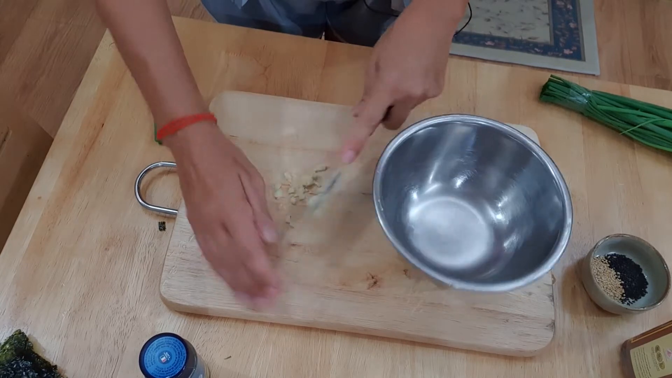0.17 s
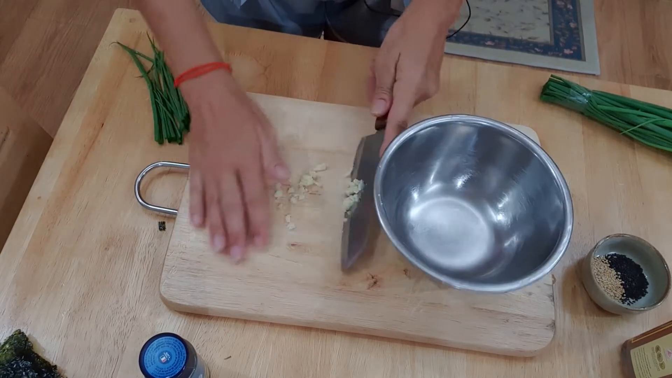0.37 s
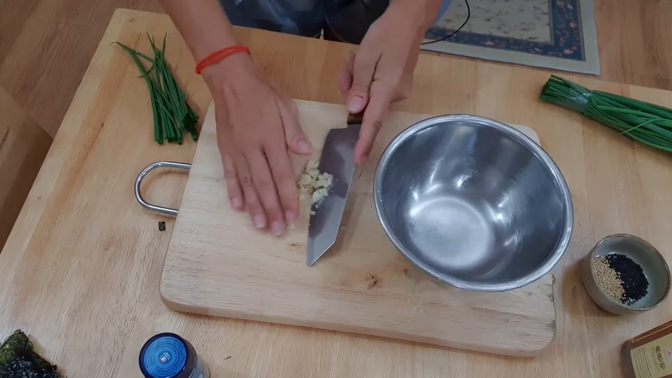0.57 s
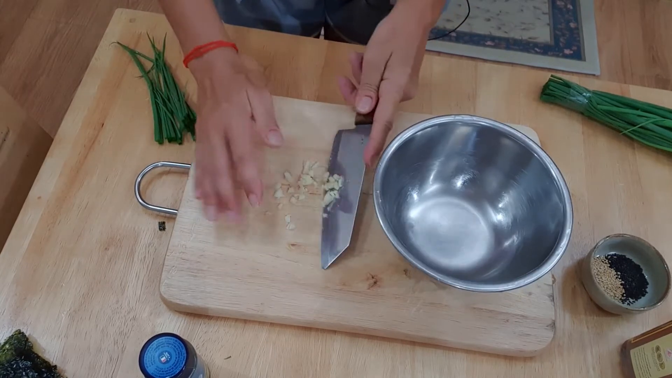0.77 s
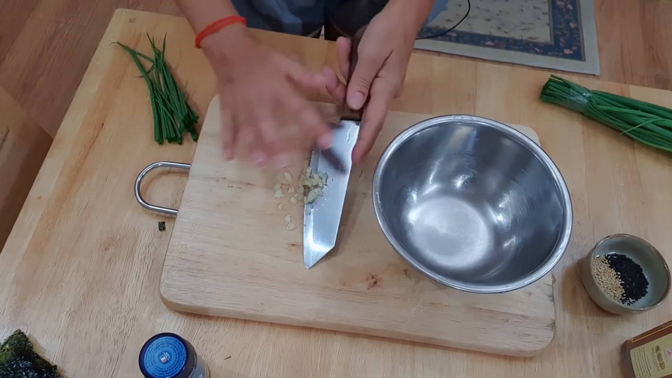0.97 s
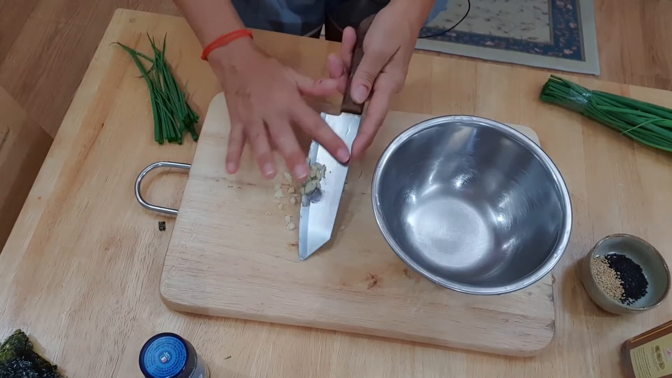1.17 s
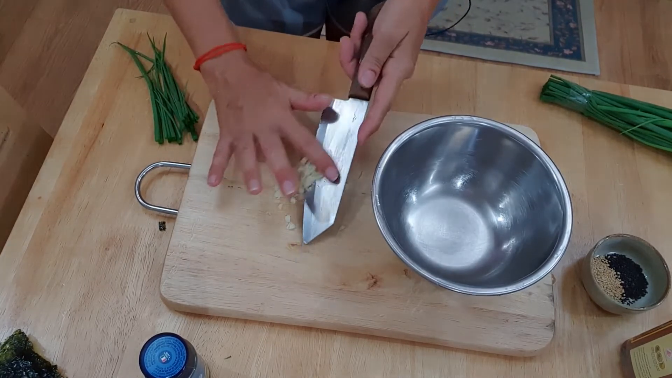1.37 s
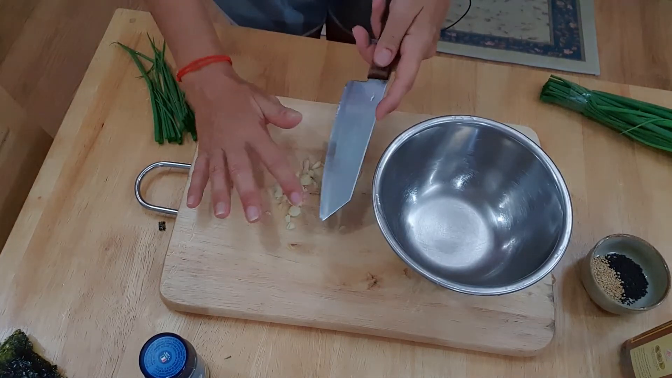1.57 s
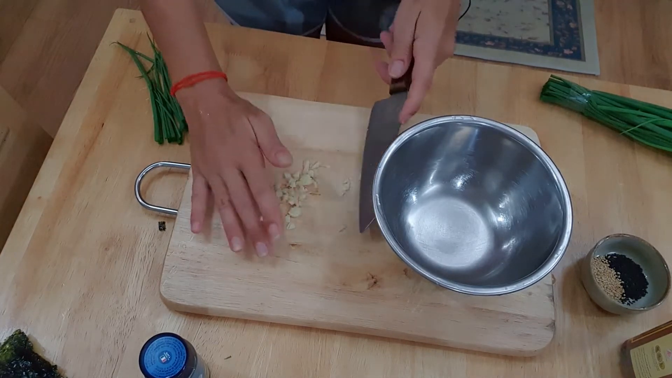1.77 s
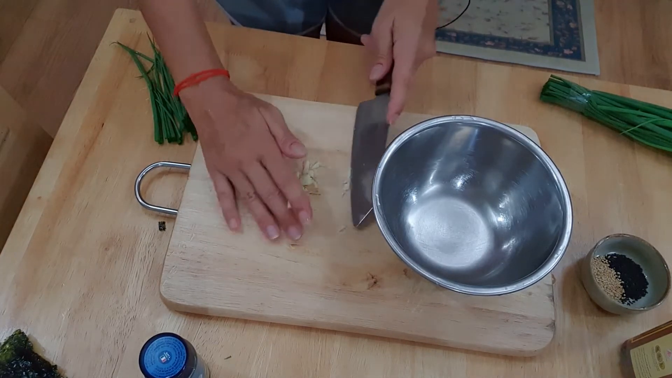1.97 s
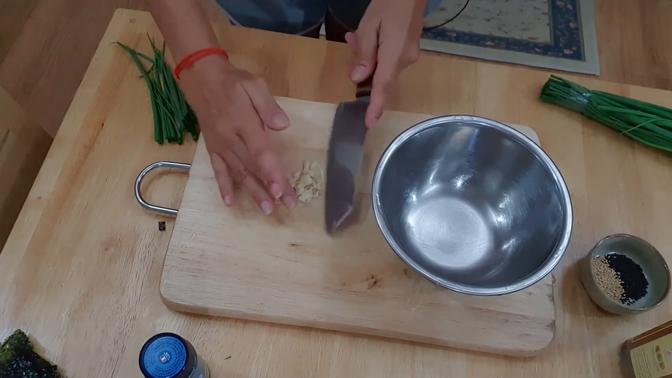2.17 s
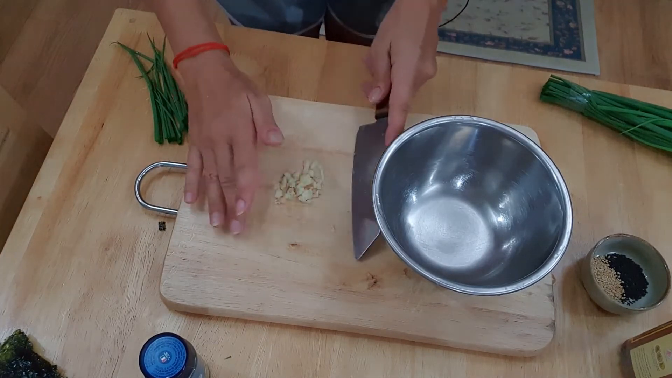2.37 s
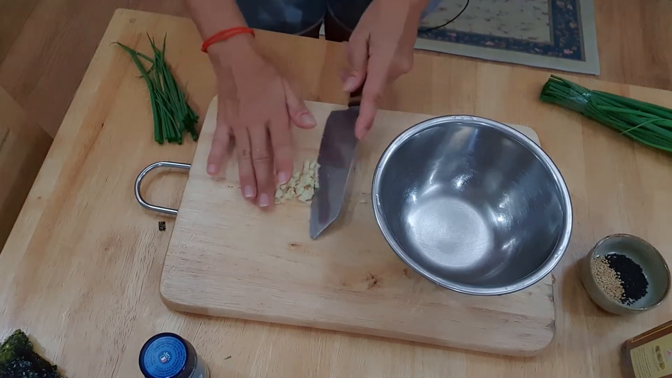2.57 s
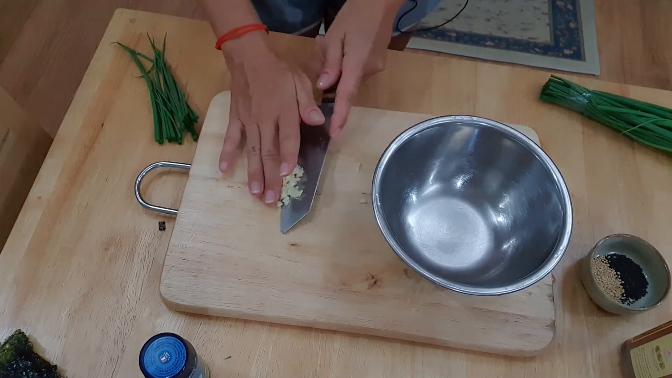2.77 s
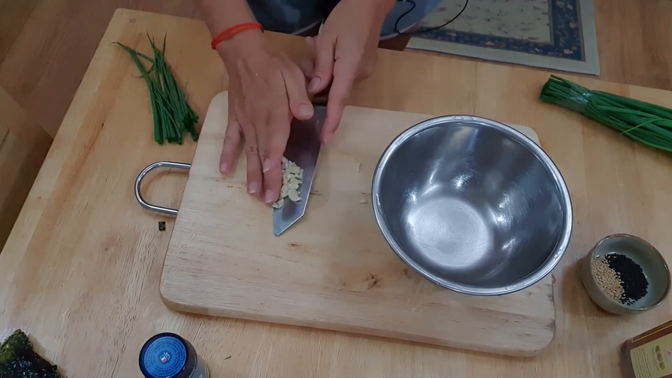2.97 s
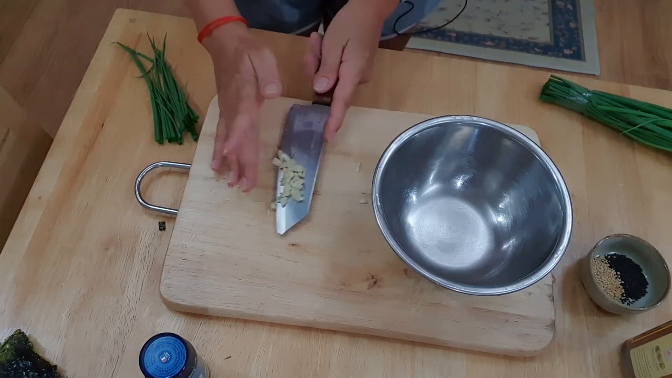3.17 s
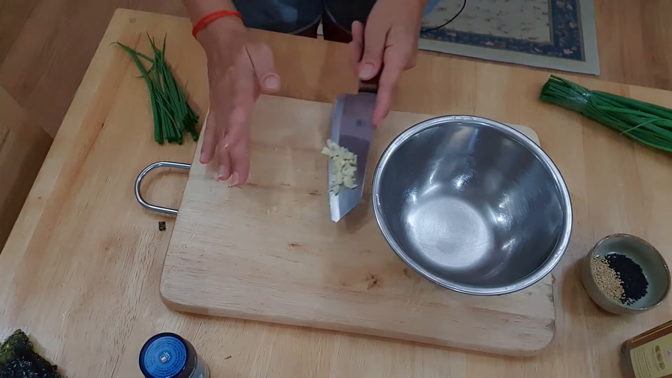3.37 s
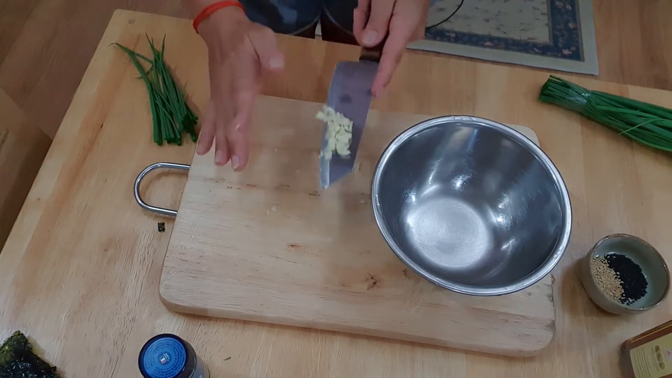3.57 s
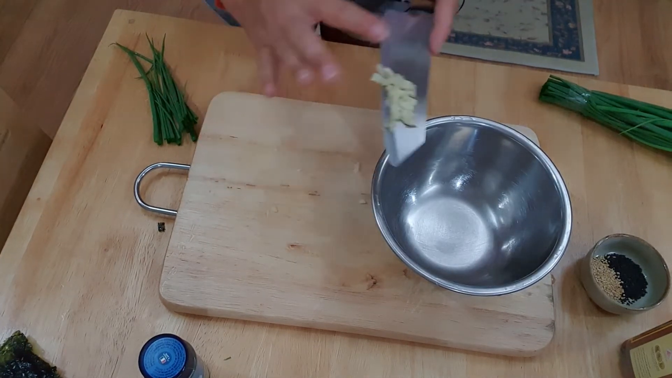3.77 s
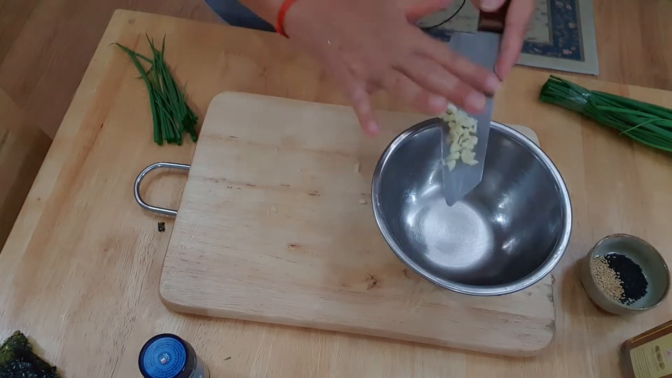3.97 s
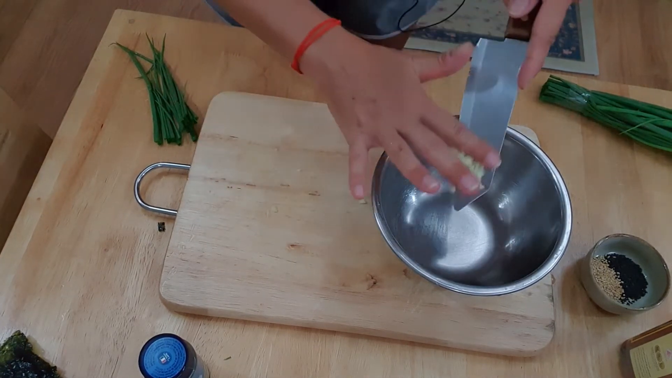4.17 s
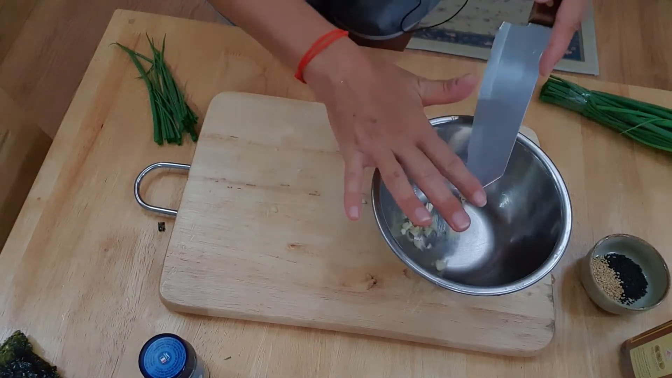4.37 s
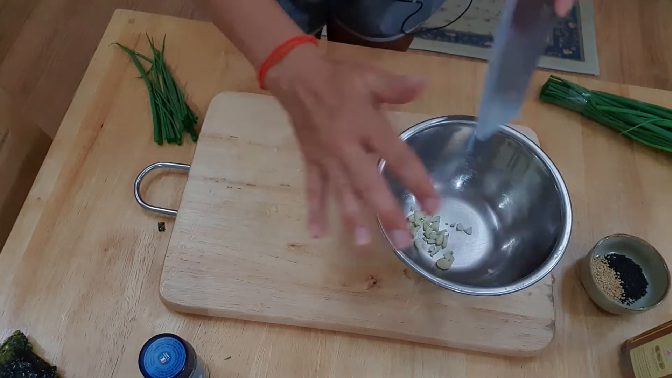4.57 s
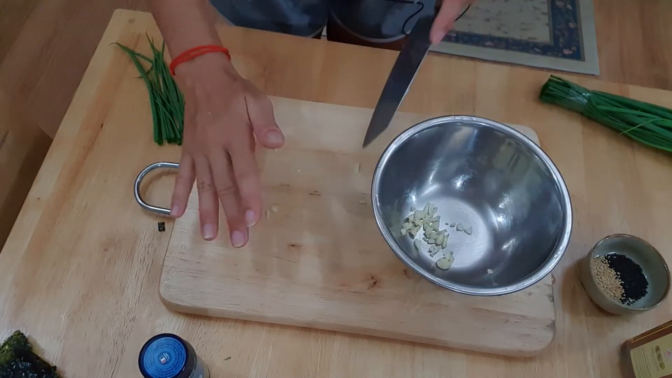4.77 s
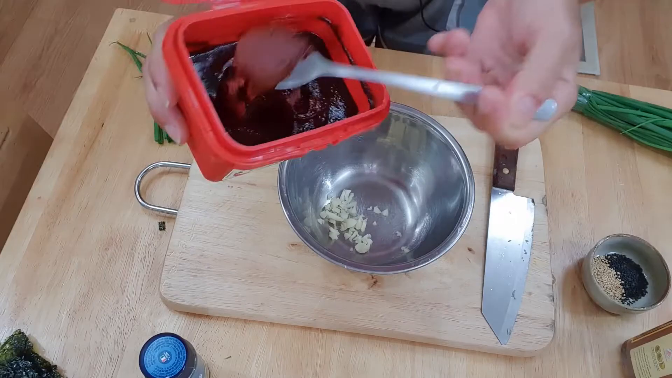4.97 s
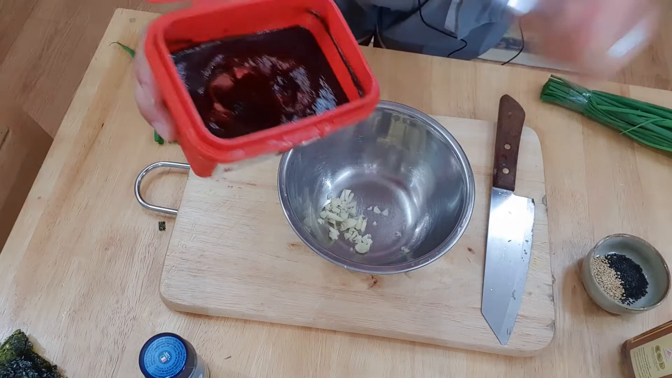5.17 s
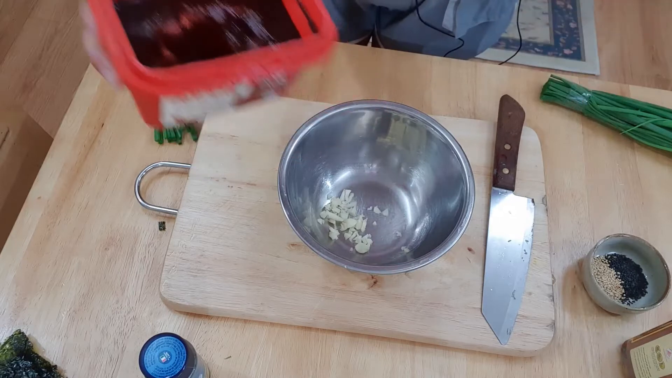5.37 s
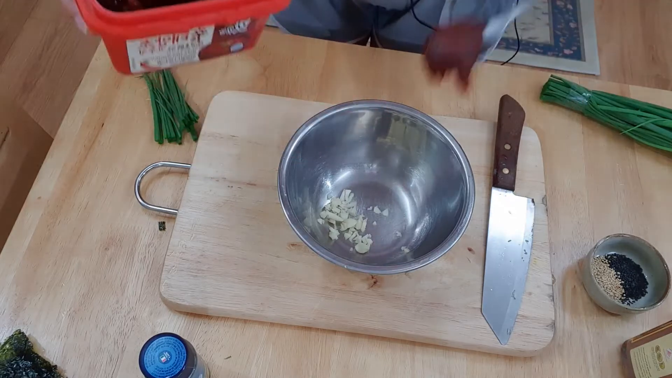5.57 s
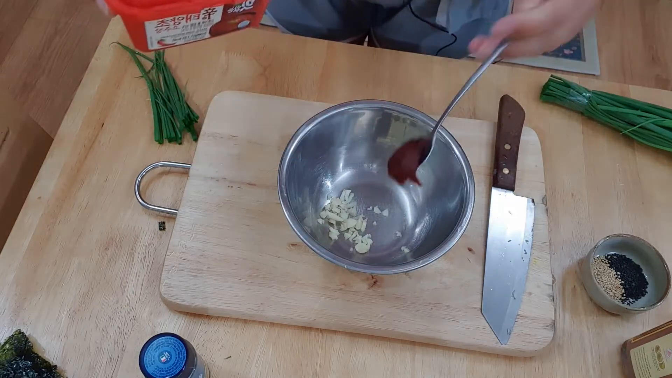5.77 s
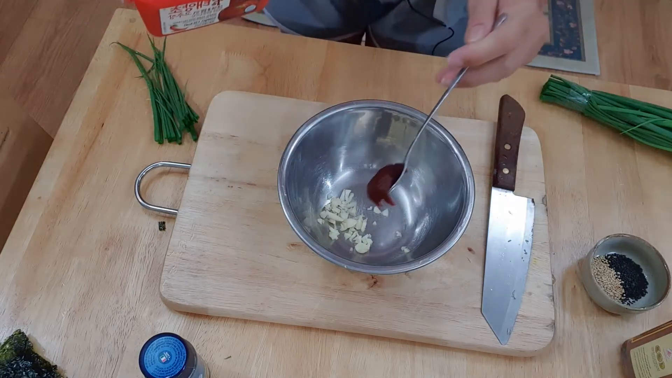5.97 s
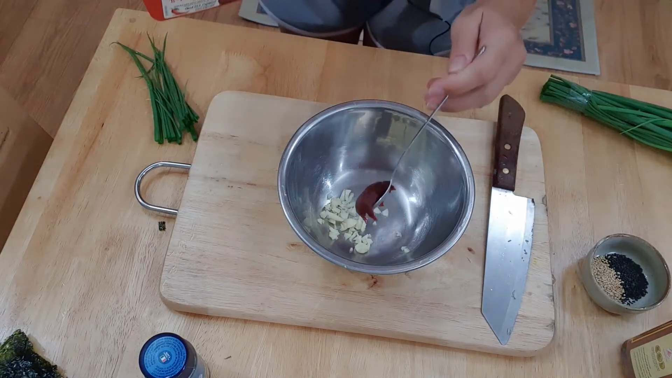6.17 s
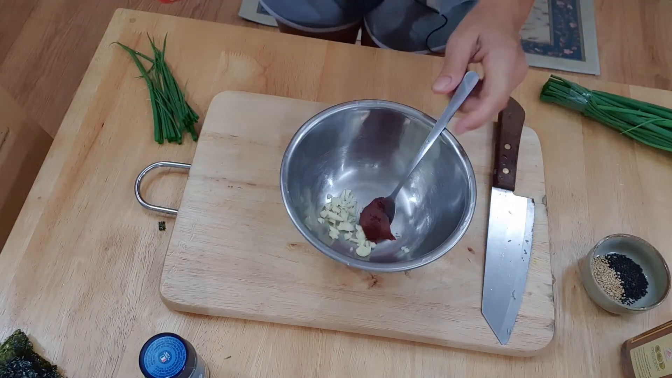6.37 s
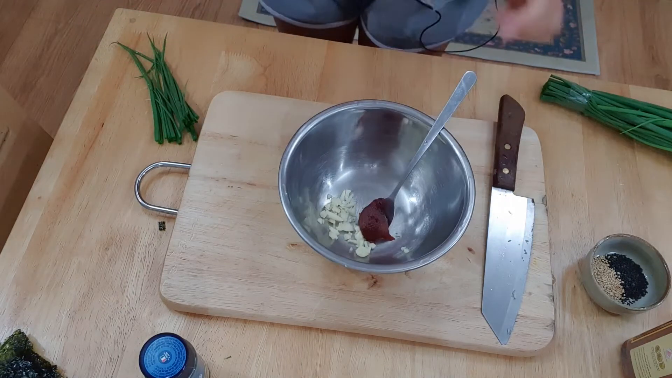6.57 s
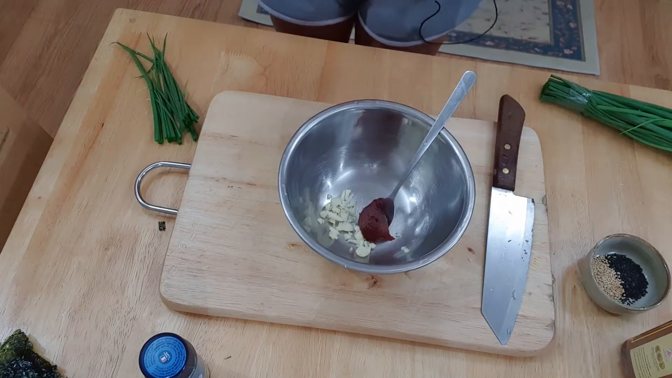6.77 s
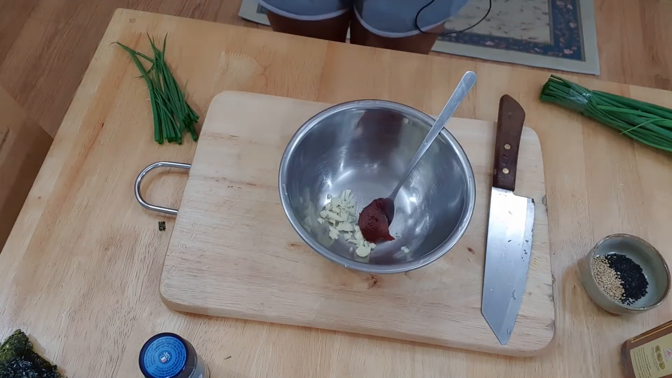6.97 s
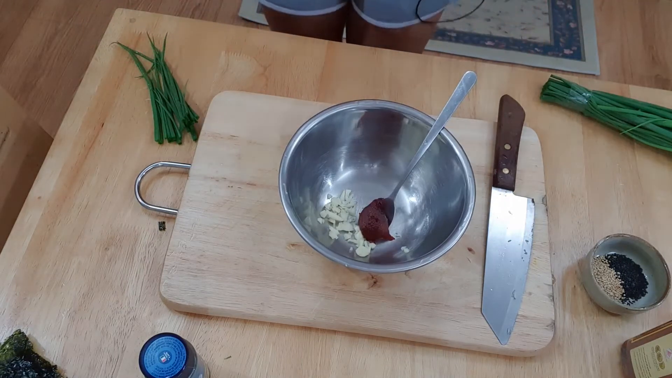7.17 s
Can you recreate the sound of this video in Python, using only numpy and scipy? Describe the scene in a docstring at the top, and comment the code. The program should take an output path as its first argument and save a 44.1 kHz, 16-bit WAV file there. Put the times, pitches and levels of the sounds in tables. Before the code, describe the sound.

A low room hum lies under close kitchen handling. First comes a quick, fading rattle of a metal bowl settling on wood, then a knife click and a brief gritty scrape. Two firm board knocks follow, the first just after a thin steel graze that leaves the bowl singing. Small scrapes and moist garlic pats give way to near quiet, until a dropped spoon lands with a loud clack and ringing, rapidly shrinking clinks.

```python
"""First a steel bowl rocks to rest, heard by a microphone close above a wooden chopping board in a kitchen.
A knife knocks on the board, grazes the bowl and scrapes up chopped garlic, which drops into the bowl.
Then a spoon is let go and its handle chatters against the rim, over moving air and a low motor hum.
Blows are decaying sine modes and noise bursts, rubbing is rough filtered noise,
and the walls answer through a decaying noise tail."""
import sys
import numpy as np
from scipy import signal
from scipy.fft import rfft, irfft, next_fast_len
from scipy.io import wavfile
from scipy.ndimage import map_coordinates

SR = 44100
rng = np.random.default_rng(int(sys.argv[2]) if len(sys.argv) > 2 else 0)


def waveform_to_disk(signal):
    """Save audio, clipped to [-1, 1], as 16-bit WAV at the path in sys.argv[1]."""
    frames = np.transpose(np.atleast_2d(signal))
    scaled = np.clip(frames, -1, 1) * 32767
    samples = np.round(scaled).astype(np.int16)
    wavfile.write(sys.argv[1], SR, samples)


N = 318402  # length of the scene in samples

# moving air in the room: pitch_hz, density_db [dB per Hz]
AIR_SPECTRUM = [(15, -39.5), (25, -22), (50, -5.5), (70, -8.5), (92, 0), (157, -3.5), (229, -6),
                (249, -12.5), (293, -9), (531, -20.5), (754, -15), (1100, -26.5), (1520, -32.5),
                (3350, -32), (3900, -37.5), (7500, -39.5), (8800, -54.5), (16000, -51.5)]
# steady lines: a low motor hum, and two faint high tones apart from it: pitch_hz, level_db
HUM_LINES = [(98, -62), (225.5, -60.5), (299, -73.5), (376, -74), (3530, -83), (4720, -86.5)]
# decay of the kitchen's answer: pitch_hz, t60_s
KITCHEN_DECAY = [(100, 0.9), (500, 0.74), (2000, 0.44), (6000, 0.49), (14000, 0.18)]

# the bowl rocks on its base: start_s, thud_db, base_ring_db
BOWL_ROCKS = [(0.001, -37, -35.5), (0.073, -36.5, -47), (0.094, -27, -31.5), (0.108, -41, -39.5),
              (0.163, -41.5, -61), (0.185, -43, -60), (0.218, -46, -42), (0.31, -45.5, -67),
              (0.382, -52.5, -76)]
# the knife lands on the board: start_s, wood_db, edge_click_db, blade_ring_db, table_thud_db
KNIFE_KNOCKS = [(0.436, -57, -46, -77.5, -62), (0.4537, -32, -29.5, -77, -47),
                (1.583, -58.5, -48.5, -76, -76), (1.942, -26.5, -17.5, -44, -44),
                (2.413, -36.5, -20.5, -53, -47)]
# the blade grazes the bowl's rim: start_s, rim_ring_db, blade_ring_db, rasp_db
RIM_GRAZES = [(1.883, -47.5, -46, -33)]
# the free bowl sings on after the graze, one row: start_s, damped_at_s, level_db
BOWL_SINGING = (1.886, 2.42, -42)
# the knife gathers garlic over the board: start_s, held_s, grit_db, edge_whistle_db
KNIFE_STROKES = [(0.573, 0.057, -46.5, -61), (2.02, 0.19, -54.5, -61.5), (2.159, 0.038, -52, -53),
                 (2.553, 0.032, -47, -54), (2.63, 0.04, -55, -54.5), (2.72, 0.092, -62, -70),
                 (2.84, 0.045, -60, -66)]
# fingers wipe the blade, the spoon slides in the paste: start_s, held_s, level_db
SOFT_WIPES = [(0.988, 0.043, -61.5), (1.27, 0.33, -78), (4.56, 0.07, -70), (7.028, 0.013, -57.5),
              (7.1, 0.062, -73.5)]
# garlic is flicked off the blade and lands, the spoon ticks: start_s, pat_db, tick_db, steel_ring_db
GARLIC_PATS = [(4.379, -48, -43, -56), (4.404, -45.5, -65, -87), (4.502, -38.5, -60, -73),
               (4.514, -29, -72, -79), (6.09, -70, -40.5, -75.5)]
# the spoon's paste-laden tip bumps the bowl's bottom: start_s, level_db
SPOON_BUMPS = [(6.3881, -8), (6.991, -45.5), (7.024, -46.5), (7.035, -49)]
# the spoon's handle meets the rim: start_s, ring_db, brightness_db_per_octave, shimmer_db, click_db
HANDLE_CLINKS = [(6.4205, -23, -.5, -24, -12), (6.449, -36, 3.5, -26, -21), (6.504, -44, 6, -32, -29),
                 (6.55, -49, 6, -37, -40), (6.575, -52, 6, -41, -46)]

# modes of the bowl's wall, before any damping by touch: pitch_hz, level_db, t60_s
RIM_MODES = [(1303, -10, 3), (2005, -5, 3), (2014, 3, .7), (3015, -12, .7), (3214, -7, .8), (3311, -5, .7),
             (3698, -15, .6), (3847, 0, .55), (3926, -3, .9), (4527, -16, .9), (4868, -3, .6),
             (4899, -2, .65), (5038, -10, .6), (5464, -12, 4), (5927, -16, .6), (7807, -10, .5),
             (7890, -10, .4), (11235, -11, .35), (11890, -15, .35), (12925, -21, .3), (13760, -19, .3)]
# modes of the bowl's flat base: pitch_hz, level_db, t60_s
BASE_MODES = [(1147, 0, .22), (1502, -8, .18), (1938, -22, .16), (2622, -23, .2), (3305, -20, .09)]
# modes of the table under the board: pitch_hz, level_db, t60_s
TABLE_MODES = [(121.4, 6, 0.12), (158, -1, 0.13), (215, 8, 0.12), (264, -7, 0.15), (277, -7.5, 0.21),
               (335.3, -8, 0.11), (483, -21.5, 0.33)]
# modes of the knife blade, before any damping by the hand: pitch_hz, level_db, t60_s
BLADE_MODES = [(1700, -4, .12), (2560, -2, .65), (3865, 4, .33), (5780, -6, .25), (7335, -1, .3),
               (7760, -6, .4), (8113, -5, .16)]

# the board's dull knock: pitch_hz, density_db [dB per Hz]
WOOD_SPECTRUM = [(40, -58), (100, 7), (220, -18), (400, 9.5), (600, 3), (1100, 6), (1600, -10),
                 (2200, -19.5), (5000, -23.5), (9000, -46), (16000, -56)]
# the knife edge's click on wood: pitch_hz, density_db [dB per Hz]
EDGE_SPECTRUM = [(100, -50), (700, -14), (1300, 9.5), (2200, -1.5), (3200, -10), (5500, -23), (9000, -33),
                 (16000, -49)]
# steel rasping on steel: pitch_hz, density_db [dB per Hz]
RASP_SPECTRUM = [(300, -13), (1200, -16.5), (2000, -1.5), (3300, -17), (5000, -12), (7600, -4), (9300, -12),
                 (11500, -8), (15500, -17.5)]
# soft pat of garlic: pitch_hz, density_db [dB per Hz]
GARLIC_SPECTRUM = [(200, -24), (1150, -16.5), (1600, 9), (2100, -1), (2700, 2.5), (4200, -5), (6000, -18),
                   (7400, -19), (9000, -39), (16000, -41)]
# thin tick of a light contact: pitch_hz, density_db [dB per Hz]
TICK_SPECTRUM = [(500, -13), (1700, -6), (7400, 1), (9000, -31.5), (12000, -17), (16000, -17)]
# grit swept along by the blade's flat: pitch_hz, density_db [dB per Hz]
GRIT_SPECTRUM = [(200, 1), (700, 9.5), (1150, 9), (2200, 2.5), (3300, -0.5), (4400, -12.5), (6800, -2),
                 (9300, -21), (12000, -17), (15500, -11)]
# the edge whistling on wood: pitch_hz, density_db [dB per Hz]
WHISTLE_SPECTRUM = [(3800, -31), (4650, 2.5), (5000, -13), (5550, 6.5), (5850, 0.5), (6300, -27),
                    (6700, -47), (7300, -5), (7800, -16), (9300, -41), (12000, -10.5), (15500, -37)]
# moist skin on steel: pitch_hz, density_db [dB per Hz]
SQUEAK_SPECTRUM = [(500, -12), (1150, -1.5), (1600, 1), (1950, -7), (2350, 5), (2750, -8), (3100, 6.5),
                   (3650, -16), (4250, -2), (5000, -11), (7400, -13.5), (9000, -34), (12000, -21),
                   (16000, -27)]
# clack of the bowl's bottom: pitch_hz, density_db [dB per Hz]
BOTTOM_SPECTRUM = [(50, -34), (130, -11), (280, -21.5), (500, -8.5), (1000, -6), (1600, 5), (1900, -4),
                   (2300, -19.5), (3400, -9.5), (5000, -14.5), (6700, -11.5), (9000, -30), (16000, -27)]
# click of the spoon's handle: pitch_hz, density_db [dB per Hz]
CLICK_SPECTRUM = [(200, -20), (1500, -28.5), (4500, 12.5), (7500, -2.5), (9300, 1.5), (11500, 13),
                  (16000, -6.5)]
# the many weaker modes of the struck rim: pitch_hz, density_db [dB per Hz]
SHIMMER_SPECTRUM = [(900, -12), (1700, -20.5), (2300, 1), (3100, 5.5), (5100, 6), (6200, -19.5),
                    (7400, -18), (8100, 5), (9100, -21), (11000, -5.5), (13000, -19.5), (15000, -20),
                    (15800, -23.5)]

TOP_HZ = 15500  # top of the band
HARDEST_BRIGHT_DB, DULLING = 3.5, 0.38  # tilt of the hardest rock (dB/octave), tilt lost per dB of weaker ring
STROKE_ATTACK_S, STROKE_RELEASE_S = 0.016, 0.018  # the blade gathers speed and comes to rest
WIPE_ATTACK_S, WIPE_RELEASE_S = 0.026, 0.017
RESONANCE_SPACING_HZ, RESONANCE_DB = 137.1, 1  # the many small resonances of blade and board
FREE_TONE_DB, FREE_TONE_T60_S = -42, 2.2  # a wall tone with its node under the spoon; t60 of its added fade


def amp(db):
    """Decibels to gain."""
    return 10 ** (np.asarray(db) / 20)


def unit(x):
    """Scale to rms 1."""
    return x / np.sqrt(np.mean(x ** 2) + 1e-20)


def along(points, hz):
    """Read (pitch_hz, value) points on a log frequency axis."""
    point_hz, value = np.transpose(points)
    return np.interp(np.log(hz + 1), np.log(point_hz), value)


def clock(size):
    """The time of each sample in seconds."""
    return np.arange(size) / SR


def fade(t, t60):
    """A decay of 60 dB in t60 seconds."""
    return np.exp(-np.log(1000) * t / t60)


def wobble(rate):
    """A smooth random curve with rate knots a second."""
    knots = rng.standard_normal(int(N * rate / SR) + 4)
    return map_coordinates(knots, [clock(N) * rate])


def add(track, start_s, sound):
    """Mix a sound into a stereo track at start_s."""
    part = track[:, max(round(start_s * SR), 0):][:, :sound.shape[-1]]
    part += sound[..., :part.shape[1]]


def left_right(mid, side):
    """Turn a centre signal and a width signal into two channels."""
    return np.array([mid + side, mid - side])


def noise(spectrum, side_db, size=N):
    """Coloured stereo noise of rms 1; the bass is nearer to mono than the treble."""
    padded = next_fast_len(size)
    hz = np.fft.rfftfreq(padded, 1 / SR)
    width = amp(side_db + along([(150, -12.5), (600, -4.0), (4000, -0.5)], hz))
    coloured = rfft(rng.standard_normal((2, padded))) * amp(along(spectrum, hz))
    mid, side = irfft(coloured * [np.ones_like(hz), width])[:, :size]
    return unit(left_right(mid, side))


def burst(spectrum, t60, side_db, attack=0.0015, size=32768):
    """A crowd of close modes struck at once and dying together, made of fading noise."""
    t = clock(size)
    return noise(spectrum, side_db, size) * fade(t, t60) * (1 - np.exp(-t / attack))


def ring(modes, bright_db=0, size=65536):
    """Clear modes, tilted by bright_db per octave; higher ones reach the two channels out of step."""
    t = clock(size)
    hz, db, t60 = np.transpose(modes)[:, :, None]
    uneven_db, phase = rng.standard_normal((len(modes), 2)).T[:, :, None]
    tilt_db = bright_db * np.log2(hz / hz.min())
    waves = amp(db + uneven_db + tilt_db) * fade(t, t60)
    turn = 2 * np.pi * hz * t + np.pi * phase
    apart = np.minimum(hz / 5200, .75)  # phase lead or lag of each channel in radians
    mid = (waves * np.cos(apart) * np.sin(turn)).sum(0)
    side = (waves * np.sin(apart) * np.sign(phase) * np.cos(turn)).sum(0)
    onset = 1 - np.exp(-t * hz.min() * 2)
    return left_right(mid, side) * onset


def pressure(strokes, attack, release):
    """Each (start_s, held_s, level_db) stroke swells up to its start, is held and eases off."""
    t = clock(N)
    start, held, db = np.transpose(strokes)[:, :, None]
    swell = np.maximum(start - t, 0) / attack
    easing = np.maximum(t - start - held, 0) / release
    return (amp(db) * np.exp(-swell - easing)).max(0)


def rubbing(level, spectrum, rough_db):
    """Friction catches and slips many times within a stroke and sounds through close resonances."""
    slips = unit(amp(rough_db * wobble(450) + 2.4 * wobble(49)))
    size = next_fast_len(N)
    place = np.fft.rfftfreq(size, 1 / SR) / RESONANCE_SPACING_HZ
    peaks = map_coordinates(rng.standard_normal(size=512), [place], mode="mirror")
    resonances = amp(RESONANCE_DB * peaks)
    rough = slips * noise(spectrum, side_db=0.0)
    coloured = irfft(rfft(rough, size) * resonances, size)[:, :N]
    return level * unit(coloured)


def room_tone():
    """Moving air as steady noise, a low motor hum and two faint high tones, whose lines waver slightly in level
    and phase."""
    hum = np.zeros(N)
    for hz, db in HUM_LINES:
        level = amp(db + 0.5 * wobble(0.92))
        hum += level * np.sin(2 * np.pi * hz * clock(N) + 0.43 * wobble(1.6))
    return amp(-57) * noise(AIR_SPECTRUM, side_db=2) + hum


def kitchen(x, size=32768):
    """The walls' answer: a noise tail in which each frequency dies at its own speed."""
    raw = noise([(100, -1.9), (16000, -0.11)], side_db=-2.5, size=size)
    hz, t, bands = signal.stft(raw, SR, nperseg=256)
    dying = bands * fade(t, along(KITCHEN_DECAY, hz)[:, None])
    tail = signal.istft(dying, SR, nperseg=256)[1]
    tail = tail * (1 - np.exp(-(clock(tail.shape[1]) / 0.0009) ** 2))
    return signal.fftconvolve(x, tail / np.linalg.norm(tail[0]), axes=1)[:, :N]


def wiping():
    """Soft, moist rubbing on steel squeaks faintly."""
    level = pressure(SOFT_WIPES, WIPE_ATTACK_S, WIPE_RELEASE_S)
    return rubbing(level, SQUEAK_SPECTRUM, rough_db=3.0)


def scraping():
    """In each stroke the flat of the blade sweeps grit along while its edge whistles on the wood."""
    grit_strokes = [(s, held, grit_db) for s, held, grit_db, _ in KNIFE_STROKES]
    edge_strokes = [(s, held, edge_db) for s, held, _, edge_db in KNIFE_STROKES]
    grit = pressure(grit_strokes, STROKE_ATTACK_S, STROKE_RELEASE_S)
    edge = pressure(edge_strokes, STROKE_ATTACK_S, STROKE_RELEASE_S)
    return rubbing(grit, GRIT_SPECTRUM, rough_db=1.0) + rubbing(edge, WHISTLE_SPECTRUM, rough_db=-2.5)


def singing_bowl(count=3):
    """The lowest wall tones hang in the air; the next knock of the knife damps the upper pair."""
    out = np.zeros((2, N))
    start, damped_at, db = BOWL_SINGING
    lowest, *pair = RIM_MODES[:count]
    upper = ring(pair)
    since = np.maximum(start + clock(upper.shape[1]) - damped_at, 0)
    tones = ring([lowest]) + amp(0.5) * upper * fade(since, 2.6)
    add(out, start, amp(db) * tones)
    return out


def lingering_tone(order=13):
    """The handle's first clink starts a tone that the spoon, resting on its node, cannot drain."""
    out = np.zeros((2, N))
    tone = ring([RIM_MODES[order]])
    fading = tone * fade(clock(tone.shape[1]), FREE_TONE_T60_S)
    add(out, HANDLE_CLINKS[0][0], amp(FREE_TONE_DB) * fading)
    return out


def garlic():
    """Small light contacts: a soft pat, a thin tick and a brief ring of steel held in the hand."""
    out = np.zeros((2, N))
    for s, pat_db, tick_db, steel_db in GARLIC_PATS:
        add(out, s, amp(pat_db) * burst(GARLIC_SPECTRUM, t60=0.045, side_db=-3.5, attack=0.00064))
        add(out, s, amp(tick_db) * burst(TICK_SPECTRUM, t60=0.034, side_db=0, attack=0.0044))
        steel = ring(BLADE_MODES)
        held_db = -200 * clock(steel.shape[1])  # the hand takes a further 200 dB a second
        add(out, s, amp(steel_db + held_db) * steel)
    return out


def graze(count=3):
    """Steel rasps on steel; the blade damps the upper tones of the bowl."""
    out = np.zeros((2, N))
    for s, rim_db, blade_db, rasp_db in RIM_GRAZES:
        wall = ring(RIM_MODES[count:], bright_db=-1)
        add(out, s, amp(rim_db) * wall * fade(clock(wall.shape[1]), 0.53))
        add(out, s, amp(blade_db) * ring(BLADE_MODES))
        add(out, s, amp(rasp_db) * burst(RASP_SPECTRUM, t60=0.17, side_db=-6.0, attack=0.0021))
    return out * amp(np.array([[-1], [1]]) * 2.4)  # leans to the right


def knife():
    """The edge clicks, the board answers with a dull knock, the blade sings and the table thuds."""
    out = np.zeros((2, N))
    for s, wood_db, edge_db, blade_db, thud_db in KNIFE_KNOCKS:
        add(out, s, amp(wood_db) * burst(WOOD_SPECTRUM, t60=0.19, side_db=-5))
        add(out, s, amp(edge_db) * burst(EDGE_SPECTRUM, t60=.016, side_db=-7, attack=.0004))
        add(out, s, amp(blade_db) * ring(BLADE_MODES, bright_db=-7.5))
        add(out, s, amp(thud_db) * ring(TABLE_MODES, bright_db=3))
    return out


def rocking_bowl():
    """Each tilt of the bowl thuds through board and table and rings the base; softer ones are duller."""
    out = np.zeros((2, N))
    hardest_db = max(ring_db for _, _, ring_db in BOWL_ROCKS)
    for s, thud_db, ring_db in BOWL_ROCKS:
        bright_db = HARDEST_BRIGHT_DB - DULLING * (hardest_db - ring_db)
        add(out, s, amp(thud_db) * ring(TABLE_MODES, bright_db))
        add(out, s, amp(thud_db - 3.5) * burst(WOOD_SPECTRUM, t60=0.079, side_db=-1, attack=0.0011))
        add(out, s, amp(ring_db) * ring(BASE_MODES, bright_db))
    return out


def spoon_bumps():
    """The board under the bowl's bottom chokes each bump to a short clack with a weak longer tail."""
    out = np.zeros((2, N))
    for s, db in SPOON_BUMPS:
        add(out, s, amp(db) * burst(BOTTOM_SPECTRUM, t60=.024, side_db=-10, attack=.0004))
        add(out, s, amp(db - 19) * burst(BOTTOM_SPECTRUM, t60=.14, side_db=-6))
    return out


def shimmer_modes(count, size):
    """Many weak rim modes, one at a random place in each step of a log scale up to TOP_HZ."""
    t = clock(size)
    place, life, phase = rng.random((3, count, 1))
    step_hz = np.geomspace(1000, TOP_HZ, count + 1)[:-1, None]
    hz = step_hz * (TOP_HZ / 1000) ** (place / count)
    level = amp(along(SHIMMER_SPECTRUM, hz)) * np.sqrt(hz)  # steps widen with frequency
    level = level / np.linalg.norm(level)
    return level * np.sin(2 * np.pi * (hz * t + phase)) * fade(t, 0.23 + 0.12 * life)


def handle_chatter(count=200, size=32768):
    """The handle bounces on the rim: a click, clear rim tones and a shimmer of many weaker modes."""
    weak = shimmer_modes(count, size)
    damped = fade(clock(size), 0.43)  # the leaning spoon drains the wall's ring
    out = np.zeros((2, N))
    for s, ring_db, bright_db, shimmer_db, click_db in HANDLE_CLINKS:
        add(out, s, amp(ring_db) * damped * ring(RIM_MODES, bright_db, size))
        shared, own = rng.choice([-1, 1], (2, count))  # random signs spread the modes in stereo
        add(out, s, amp(shimmer_db) * left_right(shared, 0.98 * own) @ weak)
        add(out, s, amp(click_db) * burst(CLICK_SPECTRUM, t60=0.045, side_db=-3.5, attack=0.00046))
        add(out, s, amp(click_db - 22.5) * ring(TABLE_MODES, bright_db=-18.0))
    return out * amp(np.array([[-1], [1]]) * 0.55)  # leans slightly to the right


def scene():
    """Everything on and around the board, with the room about it."""
    wood = knife() + garlic()
    steel = rocking_bowl() + graze() + handle_chatter() + spoon_bumps()
    strokes = scraping() + wiping()
    room = kitchen(amp(-6.0) * wood + amp(-5) * (steel + strokes))
    free_tones = singing_bowl() + lingering_tone()  # these stay out of the walls' answer
    return wood + steel + strokes + free_tones + room + room_tone()


def record(dry):
    """The top of the band rolls off steeply around TOP_HZ."""
    size = next_fast_len(N + SR)
    hz = np.fft.rfftfreq(size, 1 / SR)
    rolloff = 1 / (1 + (hz / TOP_HZ) ** 90)
    return irfft(rfft(dry, size) * rolloff, size)[:, :N]


dry = scene()
out = record(dry)
waveform_to_disk(out)
```